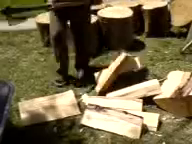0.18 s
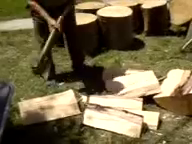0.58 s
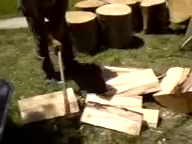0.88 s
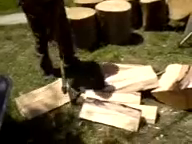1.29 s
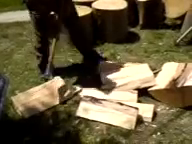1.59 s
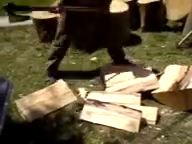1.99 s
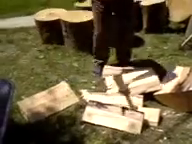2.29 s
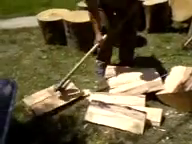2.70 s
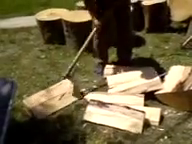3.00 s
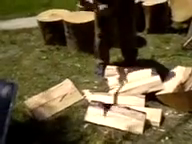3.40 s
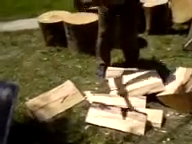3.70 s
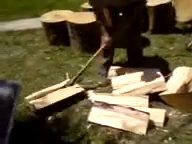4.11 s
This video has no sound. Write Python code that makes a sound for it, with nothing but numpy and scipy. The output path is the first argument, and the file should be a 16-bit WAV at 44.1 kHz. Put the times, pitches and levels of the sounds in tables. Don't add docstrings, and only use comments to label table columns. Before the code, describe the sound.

Close, dull, narrow-band outdoor sound of firewood on a lawn. Light billets clink, then logs tumble with hard low knocks. A sharp crack follows as the axe nudges a log, then quiet rustling. At about three seconds a very loud chop distorts the microphone, fibres snapping, halves clacking apart, followed by a faint thin steel ring and soft hiss.

```python
import sys
import numpy as np
from scipy import signal
from scipy.fft import rfft, irfft
from scipy.io import wavfile
from scipy.ndimage import uniform_filter1d

SR = 44100
rng = np.random.default_rng(int(sys.argv[2]) if len(sys.argv) > 2 else 0)


def nominal_scale(level):
    x = np.asarray(level, float) / 20
    return 10 ** x


def to_wav(sig):
    pcm = np.clip(np.atleast_2d(sig), -1, 1) * 32767
    pcm = np.round(pcm).astype(np.int16)
    wavfile.write(sys.argv[1], SR, pcm.T)


N = 189189


def evened(x):
    return x / np.sqrt(np.mean(x ** 2) + 1e-20)


def read(points, hz):
    f, value = np.transpose(points)
    return np.interp(np.log(hz + 1), np.log(f + 1), value)


def curve(points):
    return np.interp(np.arange(N) / SR, *np.transpose(points))


def add(mix, s, sound):
    part = mix[round(s * SR):][:len(sound)]
    part += sound[:len(part)]


def resonate(x, hz, width):
    r = np.exp(-np.pi * width / SR)
    pole = r * np.exp(2j * np.pi * hz / SR)
    return 2 * signal.lfilter([1 - r], [1, -pole], x).real


def body(x, modes):
    return sum((-1) ** k * nominal_scale(db) * resonate(x, hz, width) for k, (hz, width, db) in enumerate(modes))


def swell(t, t60, rise):
    late = np.maximum(t - rise, 0)
    fall = nominal_scale(-60 * late ** 2 / (late + rise) / max(t60, .005))
    return np.sin(np.pi / 2 * np.minimum(t / max(rise, 1e-4), 1)) ** 2 * fall


def grit(size, per_s, spread_db):
    chance = rng.random(size)
    weight = rng.exponential(1, size)
    sign = rng.standard_normal(size)
    return (chance < per_s / SR) * nominal_scale(spread_db * np.minimum(weight, 4)) * sign


# frequency in Hz, level in dB per Hz.
AIR_COLOUR = [(25, -45), (60, -16.5), (160, -36), (270, -4), (420, -6.5), (800, -9.5), (1250, -12.5),
              (2100, -8.5), (2900, -26.5), (3300, -20.5), (5000, -42.5)]


def air():
    frames, hz = N // 128 + 5, np.fft.rfftfreq(512, 1 / SR)
    a, b, patches = rng.standard_normal((frames, 257, 3)).T
    patches = uniform_filter1d(patches, 4, 0)
    patches = evened(uniform_filter1d(patches, 10, 1))
    z = (a + 1j * b) * nominal_scale(read(AIR_COLOUR, hz)[:, None] + 2.0 * patches)
    hiss = signal.istft(z, nperseg=512, noverlap=384)[1][:N]
    return nominal_scale(-46) * evened(hiss)


def tone(db, hz, flutter_db):
    t = np.arange(N) / SR
    db = db + flutter_db * evened(resonate(rng.standard_normal(N), 0, 25))
    return np.sqrt(2) * nominal_scale(db) * np.sin(2 * np.pi * hz * t)


# time in seconds, level in dB.
WHINE_LEVEL = [(0, -59), (.9, -56.5), (1.5, -53.5), (2.2, -49.5), (2.6, -58), (2.95, -47.5), (3.1, -69.5),
               (4.29, -89.5)]


def whine():
    return tone(curve(WHINE_LEVEL), 2047, 1.5)


# frequency in Hz, t60 in seconds.
YARD_T60 = [(100, 0.36), (500, 0.66), (1500, 0.69), (3500, 0.46)]


def yard(x):
    taps = np.zeros(SR)
    at = np.arange(500, SR - 20, 20)
    taps[at + rng.integers(0, 20, at.shape)] = rng.choice([-1., 1.], at.shape)
    hz, t, z = signal.stft(taps, SR, nperseg=256)
    fade = nominal_scale(-60 * t / read(YARD_T60, hz)[:, None])
    tail = signal.istft(z * fade, SR, nperseg=256)[1]
    return signal.fftconvolve(x, tail / np.linalg.norm(tail))[:N]


def strokes(table):
    t, out = np.arange(N) / SR, np.zeros((2, N))
    for s, rise, db, t60, bark_db in table:
        shape = swell(np.maximum(t - s, 0), t60, rise)
        out += (nominal_scale([[db], [db + bark_db]]) * shape) ** 2
    return out


# frequency in Hz, width in Hz, level in dB.
GRASS_MODES = [(1850, 330, -5), (2417, 360, -0.5), (2798, 200, -0.5), (3250, 276, -3)]
# frequency in Hz, width in Hz, level in dB.
BARK_MODES = [(733, 130, 0.5), (1050, 160, -1.5), (1222, 110, 0.5), (1660, 250, -1.5)]
# start in seconds, rise in seconds, peak in dB, t60 in seconds, bark over stems in dB.
DRAG_STROKES = [(0, 0.021, -37.5, 0.33, 0), (.08, .018, -34.5, 0.18, -5), (.12, 0.047, -36.5, 0.92, -0.5),
                (.235, 0.052, -38, 0.24, -2), (.415, .07, -39, 1.1, -5), (.6, 0.029, -31, .35, 0),
                (.715, 0.011, -38.5, 0.14, -12.5), (.75, 0.047, -30.5, 0.073, -7),
                (1.7, .05, -44.5, 0.55, -15), (2.19, 0.018, -35, 0.41, -5), (2.235, 0.04, -41, 0.64, -1),
                (2.385, 0.044, -34, .5, -7), (2.43, 0.054, -31, 1.02, -18), (2.49, 0.062, -47, 1.1, -15),
                (2.6, 0.057, -38.5, 0.17, -9), (3.36, 0.074, -46, 1.42, 1.2), (4.14, 0.091, -49.5, 0.33, 3)]
# start in seconds, rise in seconds, peak in dB, t60 in seconds, bark over stems in dB.
SETTLING_STROKES = [
    (.645, 0.029, -30, 0.13, -4.5),
    (.835, 0.029, -42.5, 1.74, -3),
    (1.245, 0.032, -33, 0.63, 3.5),
    (3.03, 0.019, -26, 0.7, -3.1),
]
# time in seconds, level in dB.
STIR_LEVEL = [(0, -54), (1.1, -65.5), (1.6, -53.5), (2.1, -51), (2.9, -56), (3.6, -54.5), (3.85, -60),
              (4.29, -56)]


def rustle():
    drag, settle = strokes(DRAG_STROKES), strokes(SETTLING_STROKES)
    stir = nominal_scale(2 * curve(STIR_LEVEL))
    clumps = nominal_scale(0.97 * evened(resonate(rng.standard_normal(N), 0, 60)))

    stems = resonate(grit(N, 7000, 2.1) * clumps, 2360, 1600)
    stems = evened(body(stems, GRASS_MODES))
    bark = resonate(grit(N, 4000, 2.2) * clumps, 1200, 900)
    bark = evened(body(bark, BARK_MODES))
    wood = resonate(grit(N, 2500, 2.2), 300, 180)
    wood = evened(resonate(wood, 380, 500))

    stem_power = drag[0] + settle[0] + stir
    bark_power = drag[1] + settle[1] + stir * nominal_scale(2 * -2.5)
    wood_power = drag[0] * nominal_scale(2 * -20.5) + settle[0] * nominal_scale(2 * -2.5) + stir * nominal_scale(2 * 1.5)
    return stems * np.sqrt(stem_power) + bark * np.sqrt(bark_power) + wood * np.sqrt(wood_power)


def notes(table, sag, fuzz):
    out, t = np.zeros(N), np.arange(8192) / SR
    for s, db, hz, t60, rise in table:
        turns = hz * (t + sag * 0.0093 * (1 - np.exp(-t / 0.0029)))
        wobble = 1 + fuzz * evened(resonate(rng.standard_normal(len(t)), 0, 290))
        add(out, s, nominal_scale(db) * swell(t, t60, rise) * wobble * np.sin(2 * np.pi * turns))
    return out


# start in seconds, peak in dB, pitch in Hz, t60 in seconds.
TURF_THUDS = [
    (.03, -55.5, 62, .2),
    (.095, -55, 75, .12),
    (.56, -51, 66, .1),
    (2.435, -51, 64, 0.13),
    (2.99, -21.5, 69.4, .09),
    (3.49, -62, 62, .15),
]
# start in seconds, peak in dB, pitch in Hz, t60 in seconds.
LOG_THUMPS = [(.057, -33.5, 280, 0.017), (.107, -29.5, 296, 0.041), (.39, -42, 402, .059),
              (.593, -9, 330, 0.016), (.6305, -1.5, 297, 0.016), (.7635, -8, 413, 0.0037),
              (.826, -10.5, 292.6, 0.044), (1.238, -5.5, 425, 0.012), (1.354, -33, 244, 0.031),
              (2.477, -36, 250, 0.041), (2.991, 3, 269.6, 0.02), (3.262, -27, 278, 0.014),
              (4.262, -40.5, 390, .04)]
# start in seconds, peak in dB, pitch in Hz, t60 in seconds.
LOG_ROCKS = [
    (.66, -28, 330, .08),
    (.857, -28, 291, 0.023),
    (1.261, -23.5, 251, 0.079),
    (3.045, -25, 406, 0.23),
]
# start in seconds, peak in dB, pitch in Hz, t60 in seconds.
HALF_SPRINGS = [
    (1.2323, -3.4, 255.7, 0.05),
    (3.003, 1, 413, .018),
    (3.0172, -2, 806, .022),
    (3.0185, -7.5, 462, 0.023),
    (3.0292, -5.5, 330, 0.018),
]


def thuds():
    rise_cycles = (LOG_THUMPS, 1.49), (LOG_ROCKS, 4.1), (HALF_SPRINGS, 0.78), (TURF_THUDS, 0.6)
    rows = []
    for table, cycles in rise_cycles:
        rows += [(s, db, hz, t60, cycles / hz) for s, db, hz, t60 in table]
    return notes(rows, 0.089, 0.17)


# start in seconds, peak in dB, pitch in Hz, t60 in seconds.
BILLET_CLINKS = [(.1077, -20, 2707, 0.019), (.1082, -17.5, 1282, .038), (.1194, -30.5, 1050, 0.13),
                 (.2119, -23, 2514, 0.048), (.2448, -22.5, 1272, 0.055), (.3137, -32, 1315, 0.058),
                 (.3591, -31.5, 1250, .034), (.4688, -33.5, 1220, 0.15), (.4803, -24.5, 2310, 0.045),
                 (.5921, -19.5, 1347, 0.041), (.633, -25, 1016, .17), (.7138, -12, 2118, .031),
                 (.7204, -18.5, 2370, .03), (.7642, -16.5, 2273, 0.038), (.7657, -19, 1049, 0.15),
                 (.7711, -18.5, 3160, 0.022), (.825, -20, 2080, 0.019), (.826, -35, 1050, 0.23),
                 (1.2316, -6.5, 1926, 0.0085), (1.2411, -8, 1830, 0.0053), (1.2504, -4.5, 1840, 0.0096),
                 (1.3266, -16, 1270, 0.049), (1.3299, -21, 1994, 0.044), (1.364, -35.5, 2030, 0.138),
                 (1.395, -32, 2050, .16), (2.2074, -19, 2520, .018), (2.2737, -35, 3450, .08),
                 (3.0355, -2.5, 2640, 0.018), (3.062, -21, 2480, .07), (3.2634, -31.5, 1400, 0.092)]


def clinks():
    rows = [(s, db, hz, t60, .0013 + 0.024 * t60) for s, db, hz, t60 in BILLET_CLINKS]
    return notes(rows, 0.0037, 0.31)


# frequency in Hz, width in Hz, level in dB.
LOG_MODES = [(330, 66, 0), (683, 146, 4.5), (1050, 59, 3.5), (1090, 37, 8), (1680, 780, -7.5),
             (2050, 110, 9), (2573, 120, 2), (2662, 150, 5.5), (3390, 66, -1)]


def cracks(table, spread_db, ring):
    out, t = np.zeros(N), np.arange(8192) / SR
    hz = np.fft.rfftfreq(len(t), 1 / SR)
    octaves = np.log2(np.clip(hz, 400, 3500) / 1800)
    band = hz ** 4 / (hz ** 4 + 230 ** 4) / (1 + (hz / 3800) ** 8)
    for s, db, t60, tilt_db in table:
        spray = grit(len(t), 12000, spread_db)
        spray[8] = 3.6
        spray *= swell(t, t60, 0.00034)
        rung = spray + ring * body(spray, LOG_MODES)
        rung = irfft(rfft(rung) * nominal_scale(tilt_db * octaves) * band)[:6000]
        loudest = np.sqrt(uniform_filter1d(rung ** 2, size=128).max())
        add(out, s, nominal_scale(db - 6.0) * rung / loudest)
    return out


# start in seconds, peak in dB, tilt in dB per octave.
BARK_SLAPS = [(0.108, -16.5, 9.5), (0.158, -31.5, -2.5), (0.191, -24, 3.5), (0.205, -24.5, 4.5),
              (0.244, -23, 7), (0.335, -34.5, 4), (0.592, -15.5, -0.5), (0.631, -8, 1.8),
              (0.71, -18.5, 3.5), (0.763, -14.5, 15), (0.77, -12, -6.5), (0.794, -16, -6),
              (0.826, -16.5, -4.5), (1.46, -23, 1.5), (2.433, -26.5, 2.5), (2.454, -24, 3),
              (2.4985, -29.5, 7.5), (3.221, -33, -13.5), (3.263, -22.5, -2), (3.315, -34, 17),
              (4.201, -32.5, -4)]
# start in seconds, peak in dB.
TWIG_SNAPS = [(0.0847, -18.5), (0.2624, -32), (0.2968, -34), (0.3582, -29), (1.9142, -28.5), (2.2274, -26),
              (2.4846, -23.5), (2.5636, -32.5), (2.8858, -30), (2.933, -28.5), (3.106, -24.5),
              (3.176, -35.5)]


def slaps_and_snaps():
    slaps = [(s, db, .038, tilt_db) for s, db, tilt_db in BARK_SLAPS]
    snaps = [(s, db, .013, 7) for s, db in TWIG_SNAPS]
    return cracks(slaps + snaps, 1.4, 4.5)


# start in seconds, length in seconds, level in dB.
STEEL_RINGS = [
    (3.155, 0.27, -38.5),
    (3.451, 0.12, -42.5),
    (3.629, 0.02, -45.5),
    (3.706, 0.032, -52),
]


def steel():
    t = np.arange(N) / SR
    sag_db_per_s, edge_db_per_s = 11.5, 500
    levels = []
    for s, length, top_db in STEEL_RINGS:
        outside = np.maximum(s - t, t - s - length).clip(0)
        levels.append(top_db - sag_db_per_s * (t - s).clip(0) - edge_db_per_s * outside)
    return tone(np.max(levels, axis=0), 1376, 0.54)


# start in seconds, peak in dB, t60 in seconds.
BLADE_BLOWS = [(1.229, -18.5, .12), (1.2455, -15.5, .05), (1.2505, -13, .015), (1.262, -10.5, .04),
               (1.278, -20, .08), (2.9825, -6.5, .2), (2.988, 2.3, .05), (3.009, -12, .08),
               (3.036, -7, .04), (3.043, -18, .08), (3.055, -10, .04)]
# start in seconds, gap in seconds, peak in dB, t60 in seconds, tilt in dB per octave.
FIBRE_TEARS = [
    (1.2324, .0026, -.6, .011, -1.2),
    (2.9915, .0038, 6.5, .024, -.4),
    (3.0176, .0056, .8, .013, -2.2),
    (3.0297, .006, 4.8, .012, -1.5),
]
FIBRE_COUNTS = [5, 4, 2, 1]


def axe():
    rows = [(s, db, t60, -2.6) for s, db, t60 in BLADE_BLOWS]
    for (s, gap, db, t60, tilt_db), count in zip(FIBRE_TEARS, FIBRE_COUNTS):
        rows += [(s + k * gap, db, t60, tilt_db) for k in range(count)]
    return cracks(rows, 1.1, 1.0)


def scene():
    far = air() + whine()
    hits = thuds() + clinks() + slaps_and_snaps() + axe()
    return (far + nominal_scale(-26.0) * yard(hits) + rustle() + hits + steel())[None]


def roll_off(x):
    return signal.sosfilt(signal.butter(12, 16160, fs=SR, output="sos"), x)


# frequency in Hz, gain in dB.
BAND_RESPONSE = [(20, -11.5), (100, -0.5), (200, -5), (3300, -5), (3650, -9), (4150, -14.5), (4500, -28),
                 (4900, -85.5)]


def record(dry):
    hz = np.fft.rfftfreq(4096, 1 / SR)
    log_gain = np.log(nominal_scale(read(BAND_RESPONSE, hz)))
    circle = np.r_[log_gain, log_gain[-2:0:-1]]
    taps = np.fft.ifft(np.exp(np.conj(signal.hilbert(circle)))).real[:2048]
    narrow = signal.oaconvolve(dry, taps[None], axes=1)[:, 20:N + 20]
    clipped = np.clip(narrow, -.715, .715)
    edge = signal.firwin(255, 16000, fs=SR)
    return roll_off(signal.oaconvolve(clipped, edge[None], "same", axes=1))


dry = scene()
out = record(dry)
to_wav(out)
```